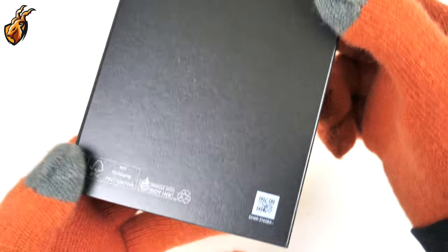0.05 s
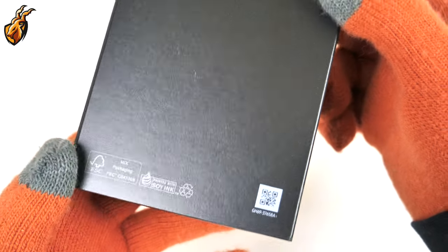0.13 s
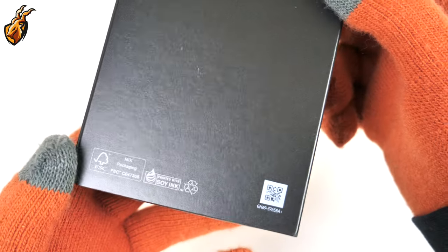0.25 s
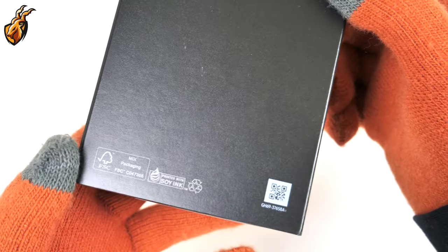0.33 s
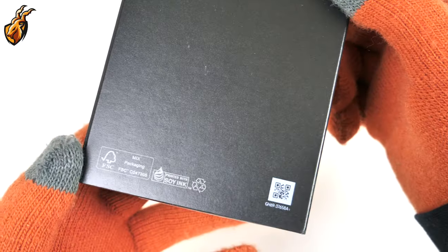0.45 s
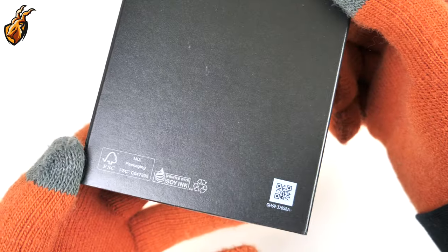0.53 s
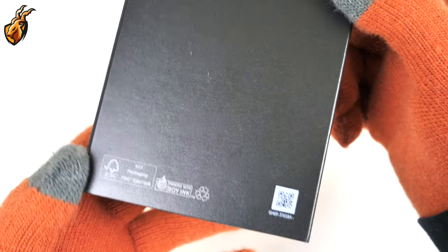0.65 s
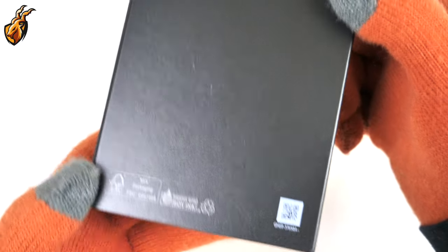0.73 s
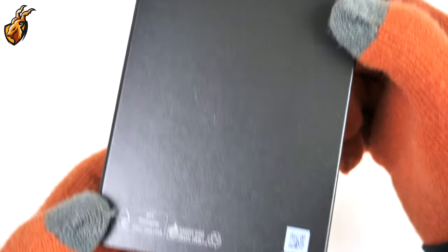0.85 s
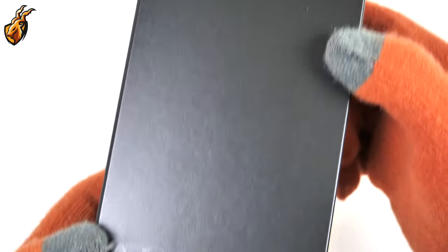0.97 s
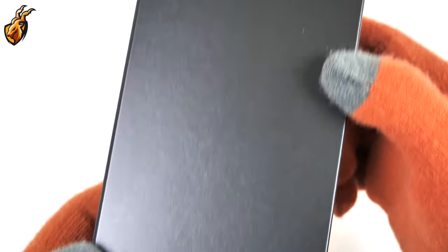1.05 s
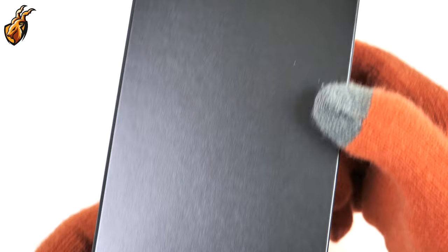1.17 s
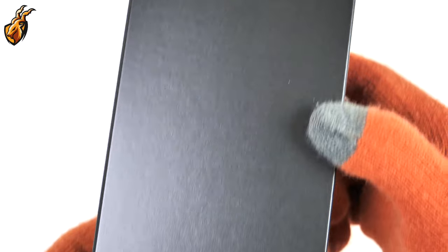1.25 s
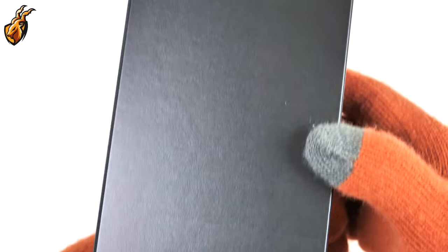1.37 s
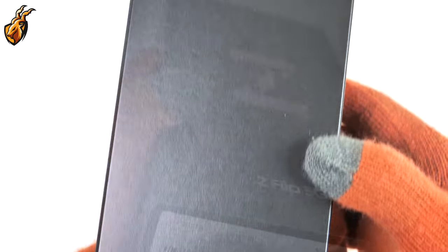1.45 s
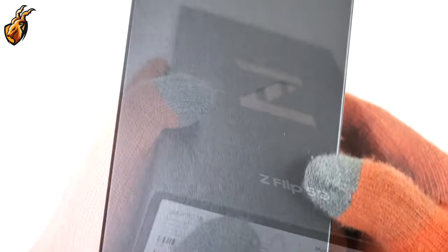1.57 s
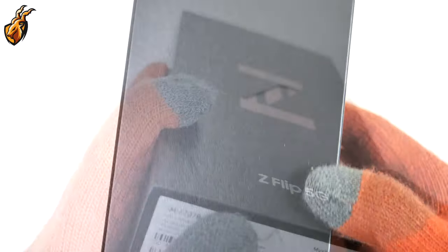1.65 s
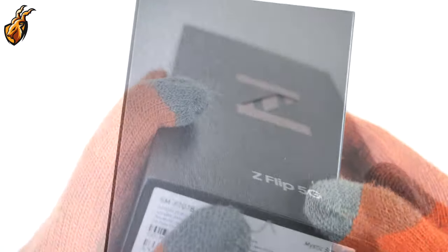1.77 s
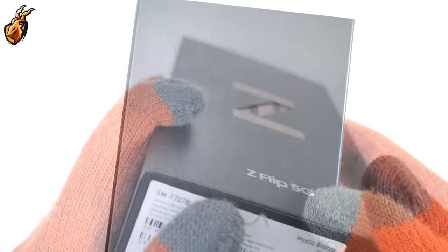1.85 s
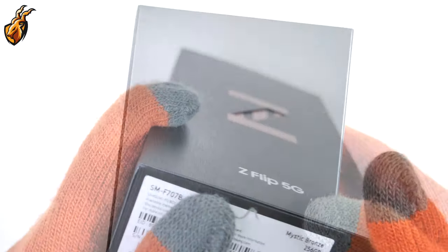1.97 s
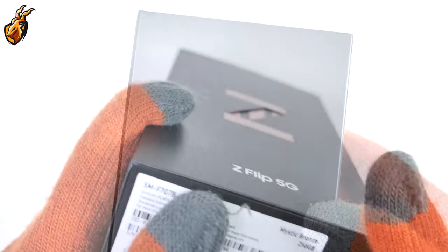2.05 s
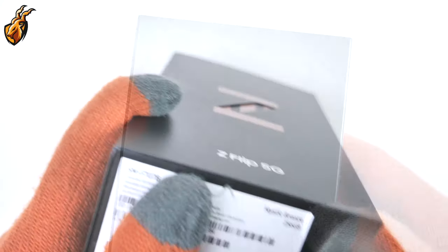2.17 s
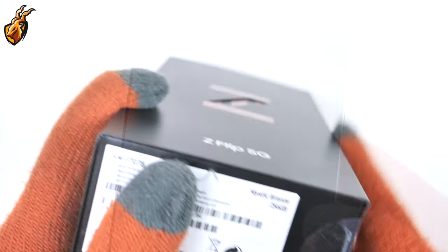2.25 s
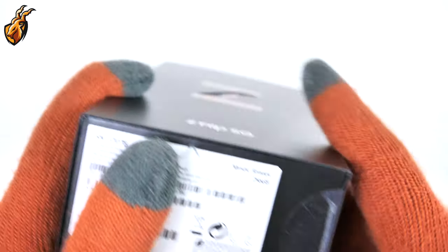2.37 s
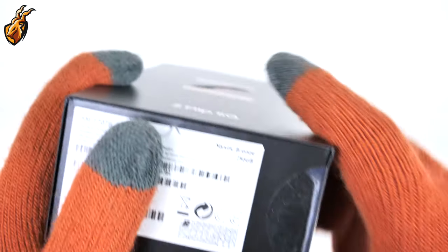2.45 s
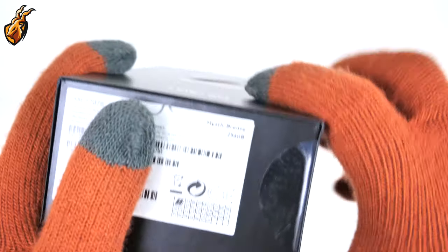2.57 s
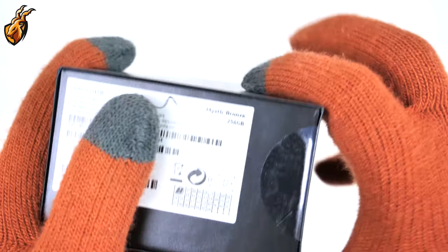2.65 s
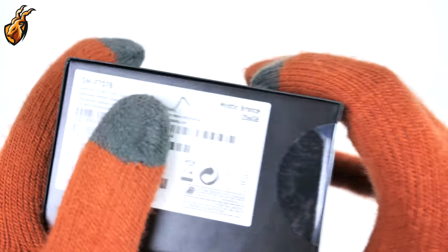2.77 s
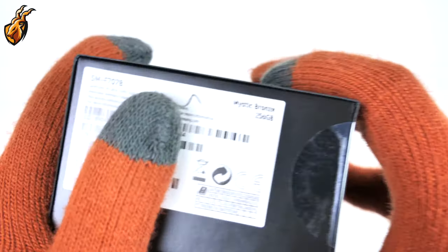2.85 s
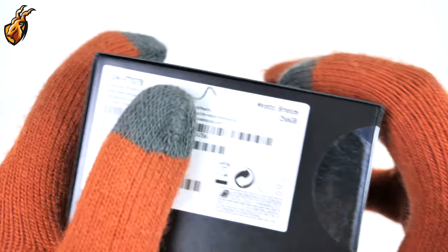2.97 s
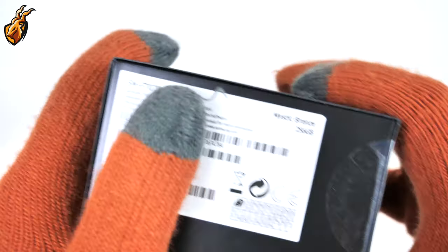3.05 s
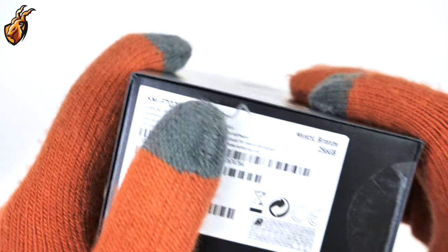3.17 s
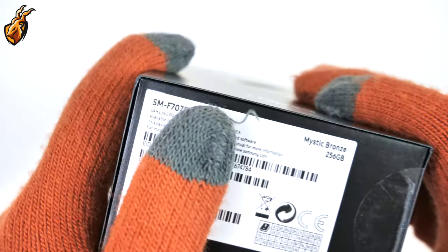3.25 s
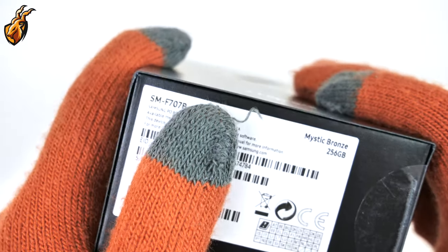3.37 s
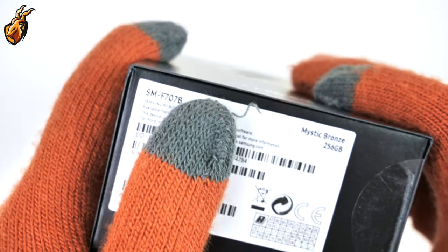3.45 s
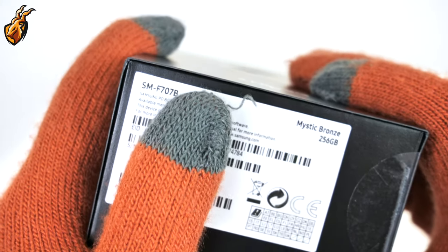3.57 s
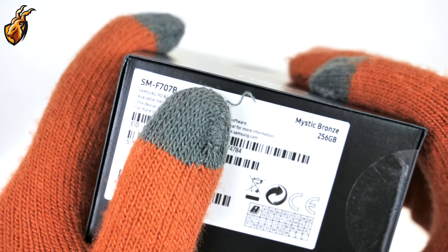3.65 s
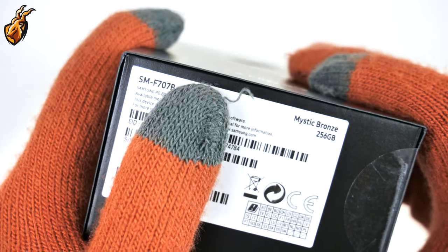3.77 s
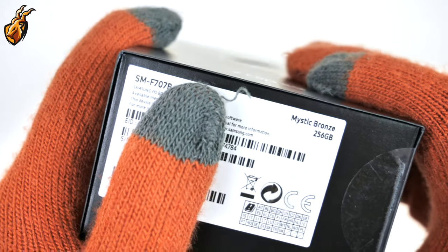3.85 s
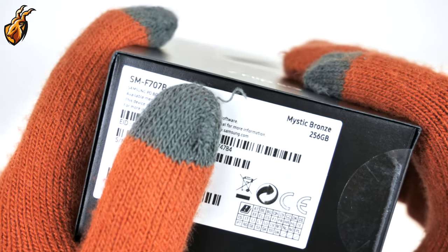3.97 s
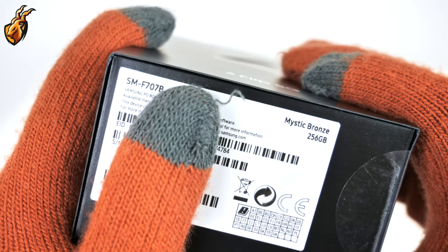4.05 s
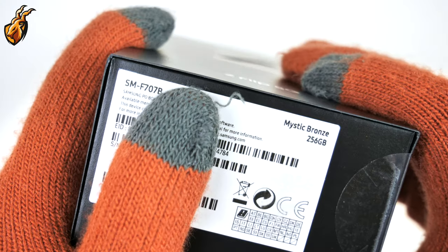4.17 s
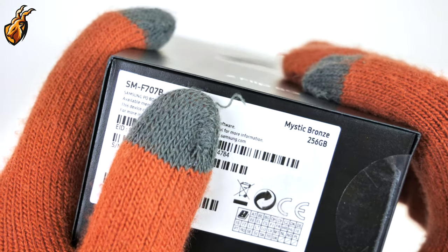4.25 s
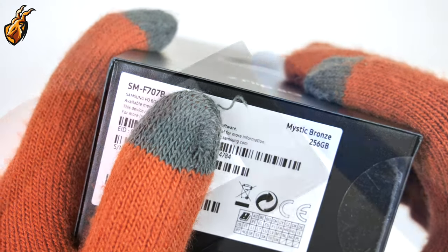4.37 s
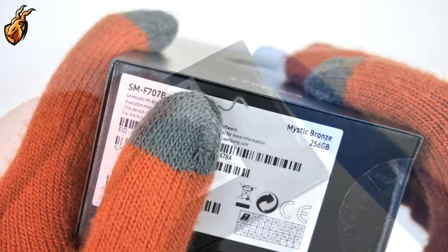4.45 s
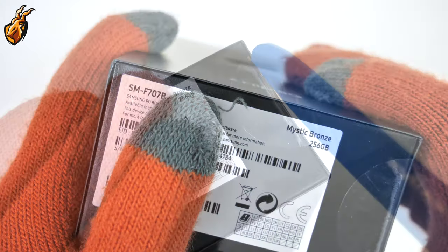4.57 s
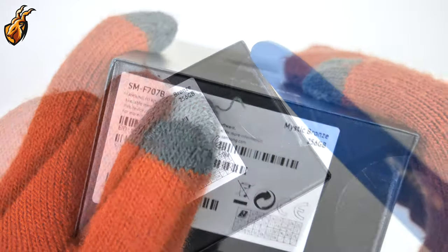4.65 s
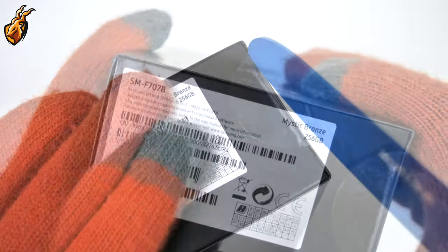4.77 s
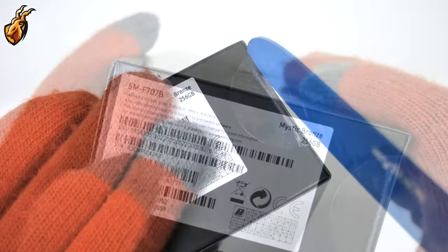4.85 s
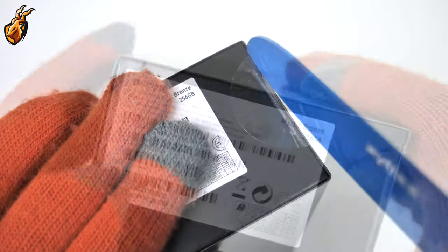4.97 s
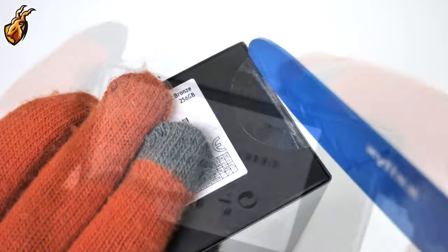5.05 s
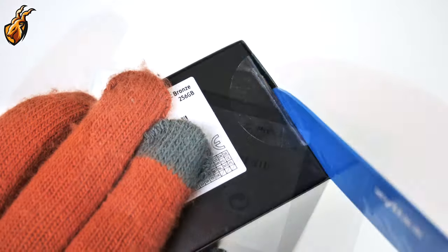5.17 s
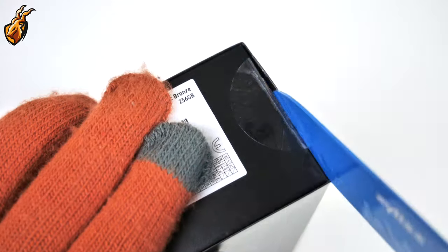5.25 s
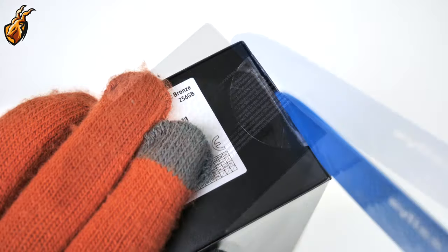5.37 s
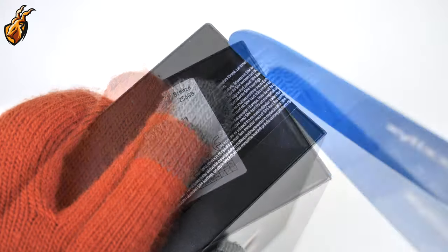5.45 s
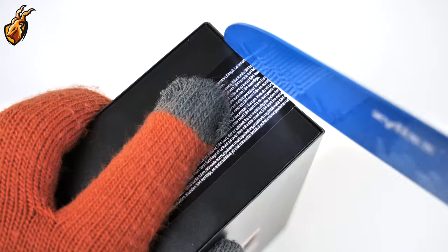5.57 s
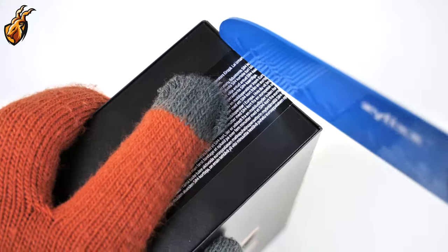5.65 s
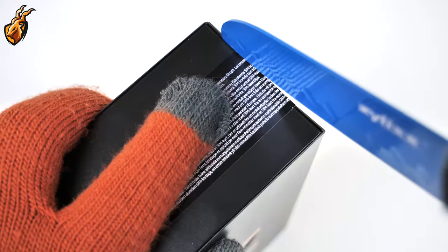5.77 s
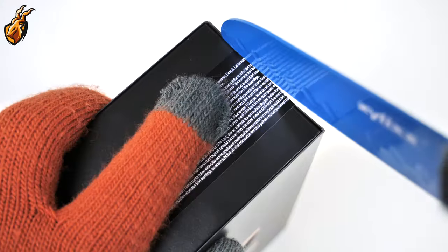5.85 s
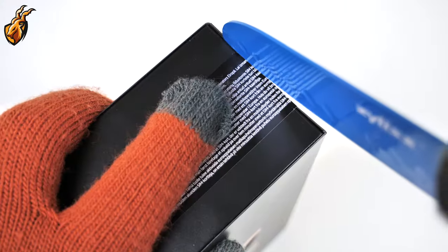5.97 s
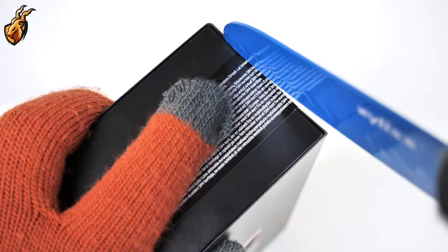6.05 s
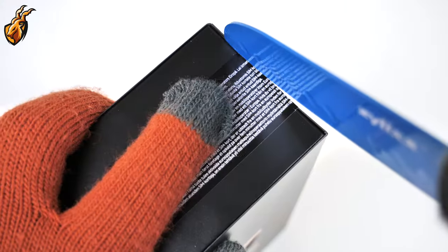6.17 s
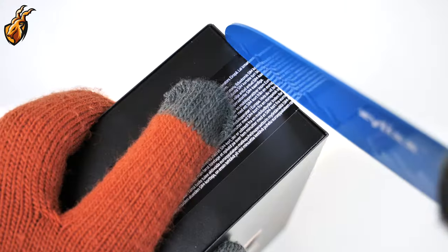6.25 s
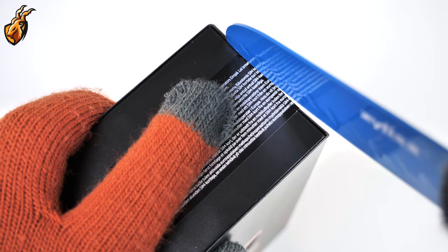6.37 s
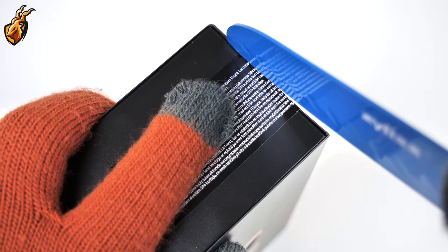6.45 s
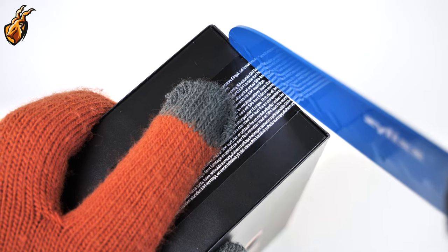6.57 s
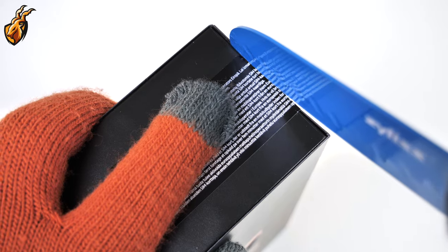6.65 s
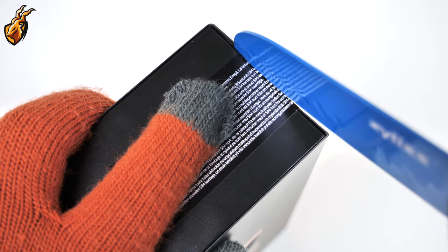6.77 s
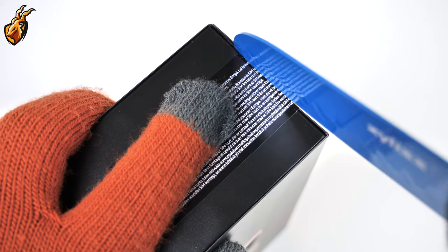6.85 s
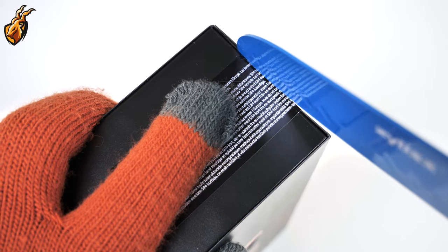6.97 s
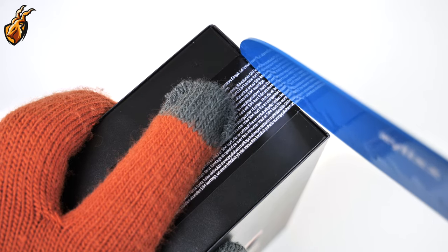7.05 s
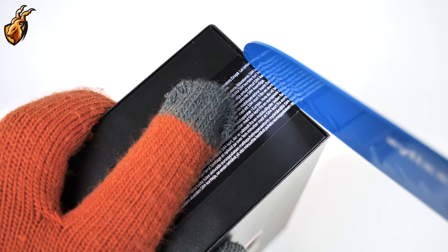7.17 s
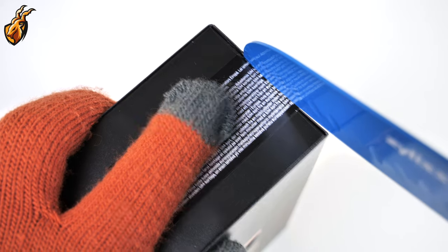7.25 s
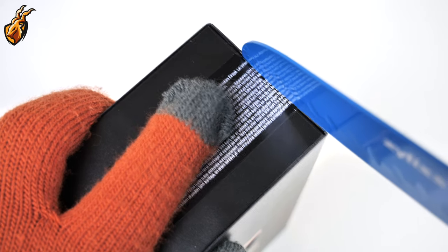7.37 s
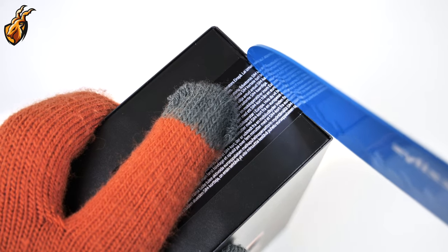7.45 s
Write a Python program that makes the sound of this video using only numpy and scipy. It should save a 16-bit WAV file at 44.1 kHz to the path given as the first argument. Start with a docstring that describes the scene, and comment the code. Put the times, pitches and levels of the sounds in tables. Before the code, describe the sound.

Close up in a small room, over hiss and a low electrical hum, gloved fingers quietly rub a cardboard box. A dull thump leads into the airy scrape of a sleeve sliding off, followed by light grips and clicks. The loudest moment is a quick rip of the seal with a sharp knock on the table. Afterwards a plastic blade scratches lightly along the seam, with a gentler double knock and a last tick.

```python
"""Knit gloves brush a stiff cardboard box close to a microphone, over hiss and a faint mains hum.
The box thumps in the hands, its sleeve slides off with a rising whistle, and fingers turn it over.
A plastic blade rips the seal and the box knocks hard on the table; a softer double knock follows.
Rubbing is made of thousands of tiny slips. Each knock is a thud, a crack and a low ring.
A small room echoes the rubs and knocks."""
import sys
import numpy as np
from scipy import signal
from scipy.fft import rfft, irfft
from scipy.io import wavfile

SR = 44100
rng = np.random.default_rng(int(sys.argv[2]) if len(sys.argv) > 2 else 0)


def unload_audio(sound):
    """Save the sound as a 16-bit wav file, at the path given as the first command line argument."""
    columns = np.transpose(np.atleast_2d(sound))
    # keep every value between -1 and 1, then stretch to whole-number steps
    steps = np.round(np.clip(columns, -1, 1) * 32767)
    wavfile.write(sys.argv[1], SR, steps.astype(np.int16))


N = 331632
TIME = np.arange(N) / SR

# Glove strokes: (start [s], length [s], level [dB], pressure change [dB/s],
# high note [Hz], its relative level [dB], low note [Hz], its relative level [dB])
GLOVE_STROKES = [(-0.03, .12, -49, -63, 3150, -12, 330, -22), (0.093, .22, -62, -7, 3120, -9, 324, -14),
                 (0.624, .28, -61.5, 15, 6500, -14, 280, -4.5),
                 (0.934, 0.25, -60.5, 26, 6520, -9, 1990, -13.5)]
# A fingertip squeaking: (time [s], pitch [Hz], relative level [dB])
FINGER_SQUEAK = [(1.66, 655, -74), (1.70, 600, -65.5), (1.745, 564, -63), (1.79, 570, -87)]
# Fingers shifting on the bare box: (start [s], length [s], level [dB])
FINGER_GRIPS = [(2.815, 0.03, -55), (2.912, 0.087, -47.5), (3.06, 0.037, -54), (3.15, 0.34, -66.5),
                (4.62, 0.095, -54.5), (4.77, 0.11, -60.5)]
# Tones of the hum: (pitch [Hz], level [dB])
HUM_TONES = [(60, -60), (130, -73), (205, -82.5)]
# How long the room echoes; a fade time is a fall of 60 dB: (frequency [Hz], fade time [s])
ECHO_FADES = [(200, 0.71), (1000, 0.38), (4000, 0.33), (12000, 0.48)]
# Knocks of the box, in the hands or on the table:
# (time [s], strength [dB], hardness as treble cutoff [Hz], ring [dB], bounces [count])
BOX_KNOCKS = [(1.935, -23.5, 200, -5, 0), (1.9423, -30.5, 520, -18, 0), (1.947, -18.5, 89.5, 2.5, 0),
              (1.969, -13, 84, -2, 2), (2.385, -41.5, 700, -1, 0), (2.577, -27, 130, -1.5, 1),
              (2.941, -39, 62, -9, 1), (3.448, -40, 1310, -16, 0), (4.06, -49.5, 900, -11.5, 0),
              (4.781, -34, 135, 2.5, 1), (5.1447, 2, 1010, -0.5, 0), (5.595, -35.5, 900, -2.5, 0),
              (5.61, -26.5, 122, 1, 0), (6.7069, -22.5, 342, 2.5, 0), (6.7309, -13.5, 225, 1.5, 0),
              (6.989, -34, 700, -4.5, 0)]
# Ringing notes of table and box: (pitch [Hz], relative level [dB], fade time [s])
RING_NOTES = [(80, -9, .3), (123, -13, .3), (160, -21, .3), (203, -1, .26), (276, -17, .27),
              (304, -18, .27), (345, -12, .24), (365, -13, .17), (402, -20, .19), (436, -22, .24),
              (595, -25, .21), (689, -30, .26), (770, -27, .24), (815, -27, .2), (873, -26, .19)]
# Snaps of card edges and blade: (time [s], level [dB], centre pitch [Hz], fade time [s])
EDGE_TICKS = [(1.9422, -42, 3500, 0.033), (2.375, -38, 5000, 0.044), (2.683, -39, 3500, 0.048),
              (2.698, -36.5, 2200, 0.037), (3.304, -49.5, 2980, 0.04), (3.366, -45, 3120, 0.085),
              (3.442, -42.5, 3750, .11), (4.0601, -45.5, 3000, 0.051), (4.58, -48.5, 2800, .038),
              (5.407, -45, 5040, 0.11), (5.4145, -28.5, 5460, 0.023), (5.6635, -39.5, 4530, 0.015),
              (6.708, -38, 5660, 0.13), (6.73, -42, 4200, 0.034), (7.402, -31.5, 9000, 0.0066)]
# Hands swinging the box: (start [s], length [s], level [dB])
BOX_SWINGS = [(1.97, 0.47, -34), (2.52, 0.57, -43.5), (4.76, .16, -43), (5.2, 0.057, -21.5),
              (5.65, 2.2, -46.5), (7.33, 0.49, -33)]
# The sleeve slides off, catching once: (time [s], hiss level [dB], scrape offset [dB])
SLEEVE_PULL = [(2.04, -72, 6), (2.09, -52, -1.5), (2.23, -41, -20.5), (2.3, -48, -8), (2.362, -48.5, -12),
               (2.382, -40, -17), (2.392, -42, -8), (2.422, -54, -10.5), (2.522, -47, -10.5),
               (2.606, -50, -0.5), (2.676, -46, -5.5), (2.9, -63, -1)]
# The shrinking overlap of sleeve and box whistles: (time [s], pitch [Hz], level [dB])
GAP_WHISTLE = [(2.06, 3400, -83), (2.12, 3700, -55), (2.19, 3950, -51), (2.23, 5600, -53),
               (2.27, 7000, -64), (2.33, 7400, -67)]
# The blade rips the seal once, then drags along the seam: (start [s], length [s], level [dB])
SEAL_RIP = (5.1075, 0.036, -17.5)
SEAM_DRAGS = [(5.25, 0.13, -46), (5.385, 0.018, -45), (5.53, 0.067, -55), (6.93, 0.11, -55),
              (7.05, 0.1, -57.5), (7.25, 0.0454, -58), (7.36, 0.055, -55)]
# The blade rings as it slips and taps: (time [s], pitch [Hz], level [dB], fade time [s])
BLADE_PINGS = [(5.416, 1250, -42, 0.059), (6.731, 4030, -37.5, 0.043)]
# The tone of each sound, from bass to treble: (frequency [Hz], relative level [dB])
KNIT_TONE = [(100, 1), (650, -6), (1400, -1.5), (1950, -2.5), (2400, -3.5), (3300, 0), (4600, -2.5),
             (6500, -1), (8000, -5), (15000, -11)]
GRIP_TONE = [(100, -21), (400, -1), (800, 3), (1200, 7.5), (2100, -2), (2550, 8), (4100, 9), (5100, 4),
             (8500, 3), (11000, 1), (15500, -6)]
BACKGROUND_TONE = [(15, -29.5), (25, -3.5), (69, -5.5), (96, -9), (136, -8), (169, -16), (204, -5),
                   (233, -16.5), (267, -14.5), (421, -22.5), (509, -23.5), (1170, -30.5), (15500, -31.5)]
ECHO_TONE = [(100, -24), (300, -20), (600, -11), (1000, -5), (1800, -4), (4000, -7.5), (12000, -13)]
CRACK_TONE = [(100, 18.5), (400, 28), (800, 13), (1200, 9.5), (1800, 6.5), (2400, -4), (3600, 3.5),
              (4200, 3), (5000, -5.5), (15000, -24)]
HANDLING_TONE = [(15, -12.5), (35, 9.5), (80, -10.5), (140, -13), (300, -30), (1000, -79)]
SLIDE_TONE = [(1000, -10), (2500, -4), (4000, 3), (7000, 4.5), (11000, 2.5), (15500, 1.5)]
SCRAPE_TONE = [(40, 21.5), (100, 2), (200, 17.5), (400, 13), (650, 11), (900, 5), (1300, 5.5), (2200, 3),
               (4500, 4.5), (9000, -41)]
RIP_TONE = [(60, 16), (250, 10.5), (600, 0), (1400, 1.5), (2500, -6.5), (4200, -1), (6000, -5),
            (10000, -6.5), (15500, -5.5)]
DRAG_TONE = [(80, 12), (220, 11), (400, 5.5), (800, 0.5), (1280, 0.5), (2200, -9.5), (4000, -3.5),
             (6000, -12), (15500, -14.5)]


def amp(db):
    """Turns decibels into a number to multiply a sound by."""
    return 10 ** (np.asarray(db) / 20)


def unit(x):
    """Scales a sound to an average strength (rms) of 1."""
    return x / np.sqrt(np.mean(x ** 2) + 1e-20)


def fade(t, fade_time):
    """Falls by 60 dB in each fade time."""
    return np.exp(-np.log(1000) * t / fade_time)


def read(points, hz):
    """Reads between a table's rows, with octaves evenly spaced."""
    frequencies, values = np.transpose(points)
    return np.interp(np.log(hz + 1), np.log(frequencies + 1), values)


def level(times, db):
    """Volume gliding from point to point; silent before and after."""
    return amp(np.interp(TIME, times, db, left=-200, right=-200))


def add(mix, start, sound):
    """Mixes a sound in at a start time in seconds."""
    part = mix[round(start * SR):][:len(sound)]
    part += sound[:len(part)]


def shape(x, tone):
    """Turns each frequency up or down to follow a tone table."""
    hz = np.fft.rfftfreq(len(x), 1 / SR)
    return irfft(rfft(x) * amp(read(tone, hz)), len(x))


def noise(tone, samples=N):
    """Noise with a given tone, at strength 1."""
    return unit(shape(rng.standard_normal(samples), tone))


def wander(hz):
    """A random wobble, up to about the given rate."""
    slowing = 1 + (np.fft.rfftfreq(N, 1 / SR) / hz) ** 4
    return unit(irfft(rfft(rng.standard_normal(N)) / slowing, N))


def narrow_noise(hz, width_hz, samples=N):
    """Noise filtered twice around one pitch, which may glide."""
    turn = np.exp(2j * np.pi * np.cumsum(hz * np.ones(samples)) / SR)
    decay = np.exp(-np.pi * width_hz / SR)
    x = rng.standard_normal(samples)
    for _ in range(2):
        x = 2 * (turn * signal.lfilter([1 - decay], [1, -decay], x / turn)).real
    return unit(x)


def whistle(rows, width_hz):
    """A breathy note whose pitch and level follow a table."""
    times, hz, db = np.transpose(rows)
    return narrow_noise(np.interp(TIME, times, hz), width_hz) * level(times, db)


def push(start, length, rise_s, fade_s):
    """Volume of one hand movement: it eases in, holds, then fades."""
    t = TIME - start
    ease_in = np.sin(np.pi / 2 * np.clip(t / rise_s, 0, 1)) ** 2
    return ease_in * fade(np.clip(t - length, 0, 10 * fade_s), fade_s)


def pushes(rows, rise_s, fade_s):
    """Volume of several hand movements together."""
    return sum(amp(db) * push(start, length, rise_s, fade_s) for start, length, db in rows)


def friction(tone, slips_per_s, spread_db, shake_db):
    """Fibres catch and let go: tiny uneven slips, bunched by the shaking hand."""
    sizes = amp(spread_db * np.minimum(rng.exponential(1, N), 4))
    slips = rng.standard_normal(N) * sizes * (rng.random(N) < slips_per_s / SR)
    shake = amp(shake_db * wander(hz=58.7))
    return unit(shape(slips * shake, tone))


def gloves():
    """Soft knit brushes the sleeve, two notes to a stroke; it squeaks once, then grips the box."""
    knit = friction(KNIT_TONE, slips_per_s=14000, spread_db=0.5, shake_db=-1.3)
    strokes = np.zeros(N)
    for start, length, db, db_per_s, high_hz, high_db, low_hz, low_db in GLOVE_STROKES:
        pressure = amp(db + db_per_s * np.clip(TIME - start, 0, length))
        pressure *= push(start, length, rise_s=0.032, fade_s=0.2)
        high_note = amp(high_db) * narrow_noise(high_hz, width_hz=420)
        low_note = amp(low_db) * narrow_noise(low_hz, width_hz=250)
        strokes += pressure * (knit + high_note + low_note)
    grips = friction(GRIP_TONE, slips_per_s=18000, spread_db=-2, shake_db=-0.5)
    grips *= pushes(FINGER_GRIPS, rise_s=0.034, fade_s=0.23)
    squeak = amp(1) * whistle(FINGER_SQUEAK, width_hz=170)
    return strokes + squeak + grips


def background(dip_db=-2.5, dip_width_s=0.22):
    """Room rumble, a wavering mains hum, and microphone hiss that dips twice and steps up once."""
    steady = amp(-58) * noise(BACKGROUND_TONE)
    rumble = signal.sosfiltfilt(signal.butter(2, 400, fs=SR, output="sos"), steady)
    hum = sum(amp(db) * unit(np.sin(2 * np.pi * hz * TIME + 0.5 * wander(hz=2.1)))
              for hz, db in HUM_TONES)
    dips = sum(np.exp(-((TIME - middle_s) / dip_width_s) ** 2) for middle_s in (1.85, 4.53))
    step_db = np.interp(TIME, (5.66, 5.5), (2.5, 5))
    hiss = (steady - rumble) * amp(step_db + dip_db * dips)
    return rumble + hiss + hum


def room_echo(sound):
    """Nearby walls return a crowd of echoes; each frequency fades at its own speed."""
    echoes = rng.choice([-1., 1.], SR) * (rng.random(SR) < 0.1)
    echoes *= TIME[:SR] > 0.004  # nothing returns in the first 4 ms
    hz, t, bands = signal.stft(echoes, SR, nperseg=256)
    bands = bands * fade(t, read(ECHO_FADES, hz)[:, None])
    tail = signal.istft(bands, SR, nperseg=256)[1]
    tail = shape(tail / np.linalg.norm(tail), ECHO_TONE)
    return signal.fftconvolve(sound, tail)[:N]


def blows(gap_s=0.038, bounce_db=-6, bounce_cutoff_hz=95):
    """Lists each knock and the weaker bounces of the rocking box."""
    return [(start + k * gap_s, db + k * bounce_db, bounce_cutoff_hz if k else cutoff_hz, ring_db)
            for start, db, cutoff_hz, ring_db, bounces in BOX_KNOCKS
            for k in range(1 + round(bounces))]


def low_ring(t, build_cycles):
    """Each note of box and table builds as the blow spreads, then dies away."""
    ring = np.zeros(len(t))
    for k, (hz, db, fade_s) in enumerate(RING_NOTES):
        wave = (-1) ** k * np.sin(2 * np.pi * hz * t)  # every other note starts downward
        build = 1 - np.exp(-hz * t / build_cycles)
        ring += amp(db) * wave * build * fade(t, fade_s)
    return ring


def crack(t, cutoff_hz, fade_s=0.032, rise_cycles=0.35, hard_hz=331, db_per_octave=8):
    """The noisy snap of contact; a soft blow makes it duller, slower and quieter."""
    burst = noise(CRACK_TONE, len(t)) * fade(t, fade_s)
    dulled = signal.lfilter(*signal.butter(1, min(7 * cutoff_hz, SR / 3), fs=SR), burst)
    build = 1 - np.exp(-cutoff_hz * t / rise_cycles)
    db = 0.5 + db_per_octave * min(np.log2(cutoff_hz / hard_hz), 0)
    return amp(db) * dulled * build


def knocks(card_hz=267, thud_cycles=6.6):
    """Each blow gives a dead thud of card and a low ring; a soft one is deeper and rounder."""
    t, out = TIME[:SR], np.zeros(N)
    ring = low_ring(t, build_cycles=5)
    for start, db, cutoff_hz, ring_db in blows():
        cycles = min(card_hz, cutoff_hz) * t
        thud = -np.sin(2 * np.pi * cycles) * fade(cycles, thud_cycles)
        body = signal.lfilter(*signal.butter(2, cutoff_hz, fs=SR), thud + amp(ring_db) * ring)
        add(out, start, amp(db) * (body + crack(t, cutoff_hz)))
    return out


def ticks(rise_share=0.034):
    """Card edges and blade snap: short, broad bursts of noise that swell and die."""
    t, out = TIME[:SR // 8], np.zeros(N)
    for start, db, hz, fade_s in EDGE_TICKS:
        burst = narrow_noise(hz, width_hz=2.4 * hz, samples=len(t))
        build = 1 - np.exp(-t / (rise_share * fade_s))
        add(out, start, amp(db) * burst * build * fade(t, fade_s))
    return out


def swinging_box(tremble_db=-62):
    """The moving box sways the air slowly, with a low rumble of handling above it."""
    rumble = amp(-13) * noise(HANDLING_TONE)
    sway = narrow_noise(hz=11.15, width_hz=7.1)
    motion = amp(tremble_db) + pushes(BOX_SWINGS, rise_s=0.19, fade_s=0.6)
    return (sway + rumble) * motion


def sleeve():
    """Card slides on card: bright hiss, a low scrape where it sticks, and a rising hollow note."""
    times, hiss_db, scrape_db = np.transpose(SLEEVE_PULL)
    hiss = friction(SLIDE_TONE, slips_per_s=12000, spread_db=-1.5, shake_db=0.4)
    hiss *= level(times, hiss_db)
    scrape = friction(SCRAPE_TONE, slips_per_s=4500, spread_db=-2, shake_db=2.2)
    scrape *= level(times, hiss_db + scrape_db)
    return hiss + amp(3.5) * scrape + whistle(GAP_WHISTLE, width_hz=1500)


def blade():
    """The blade tears the seal in one burst, drags along the seam and rings when it slips."""
    rip = friction(RIP_TONE, slips_per_s=16000, spread_db=1.5, shake_db=0.5)
    rip *= pushes([SEAL_RIP], rise_s=0.025, fade_s=0.055)
    drag = friction(DRAG_TONE, slips_per_s=4000, spread_db=2.5, shake_db=1.2)
    drag *= pushes(SEAM_DRAGS, rise_s=0.024, fade_s=0.1)
    pings = sum(amp(db) * narrow_noise(hz, width_hz=340) * push(start, 0, rise_s=0.0027, fade_s=fade_s)
                for start, hz, db, fade_s in BLADE_PINGS)
    return rip + drag + pings


def scene():
    """Everything sits straight ahead; only a trace of hiss differs between left and right."""
    near = gloves() + sleeve() + blade() + ticks() + knocks()
    side_hiss = amp(-64.5) * rng.standard_normal(N)
    centre = near + room_echo(near) + swinging_box() + background()
    return np.array([centre + side_hiss, centre - side_hiss])


def record(dry):
    """The hardest knock overloads the input; then the highest treble is cut away."""
    clipped = np.clip(dry, -1, 1)
    treble_cut = signal.firwin(511, 15750, window=("kaiser", 9), fs=SR)
    return signal.oaconvolve(clipped, treble_cut[None], "same")


dry = scene()
out = record(dry)
unload_audio(out)
```